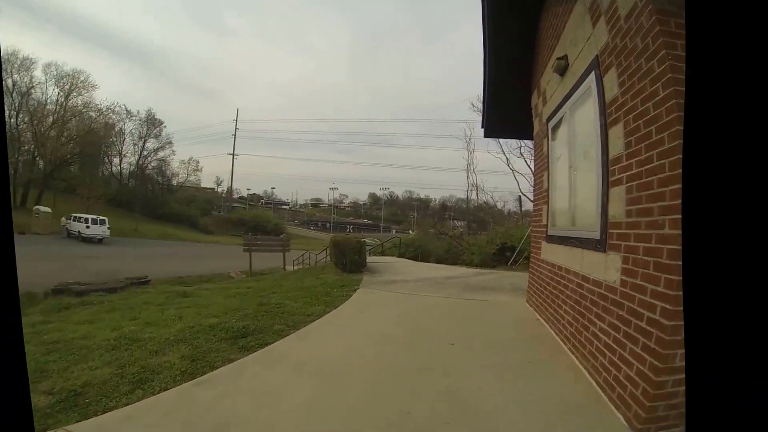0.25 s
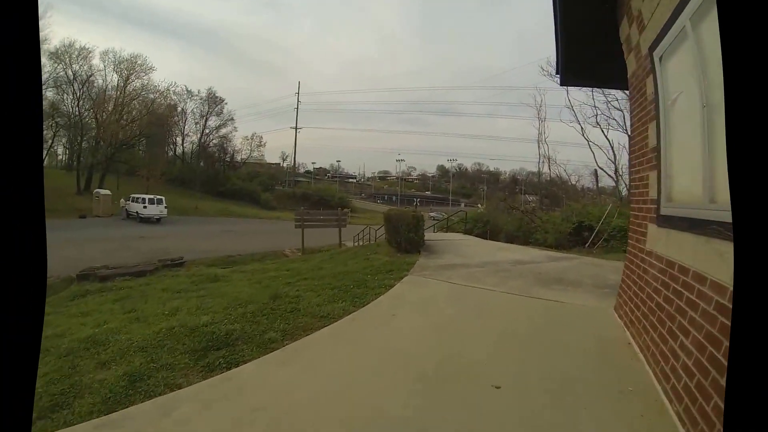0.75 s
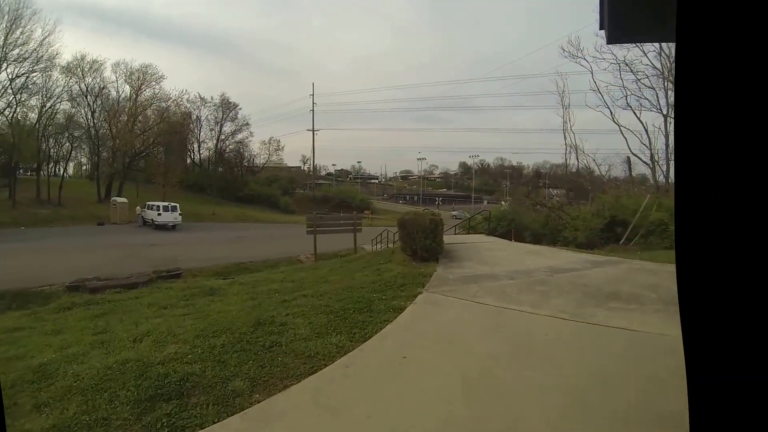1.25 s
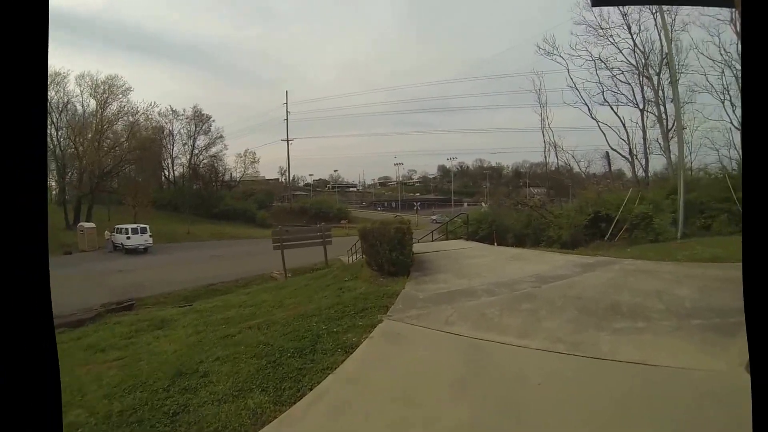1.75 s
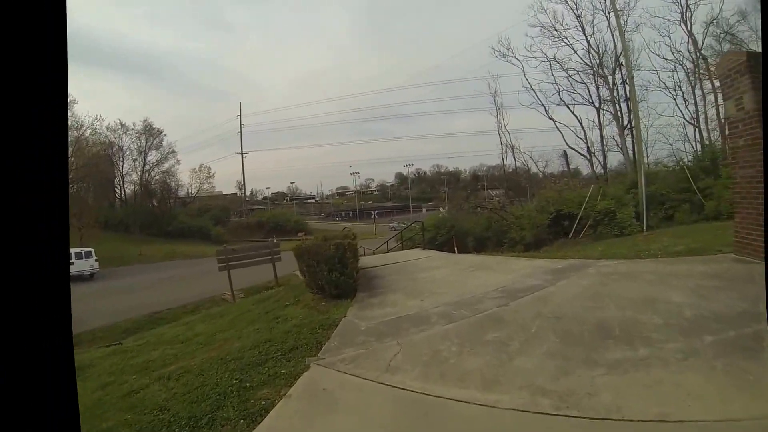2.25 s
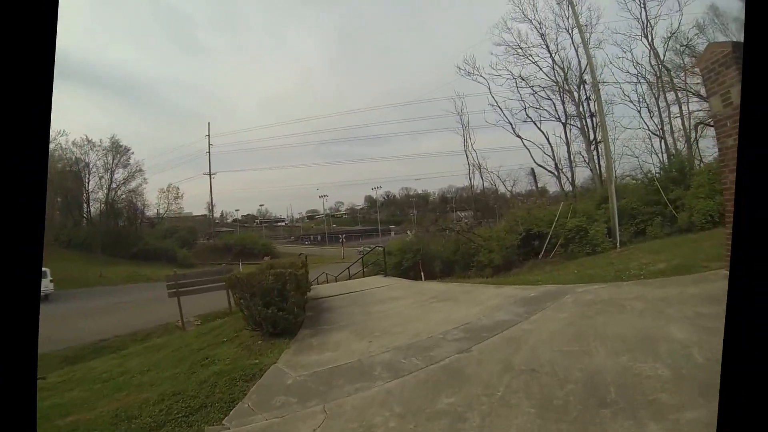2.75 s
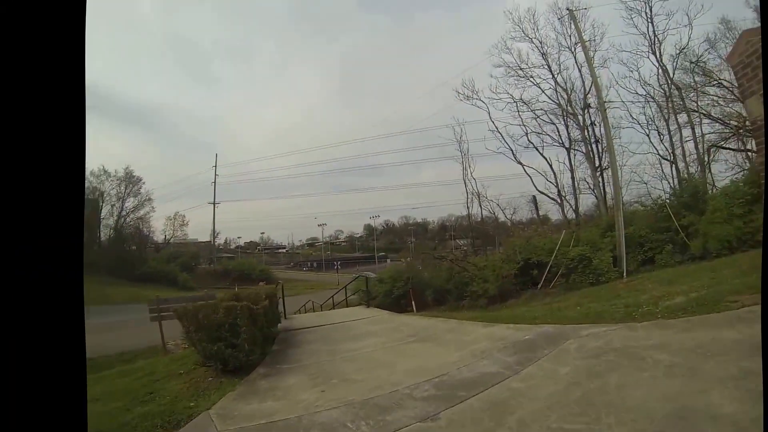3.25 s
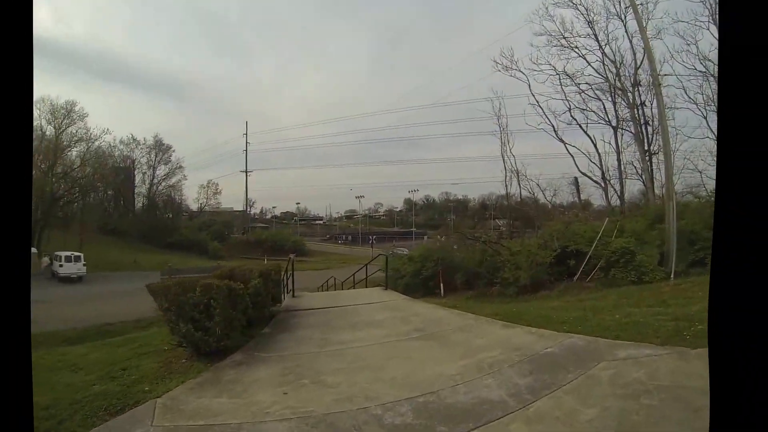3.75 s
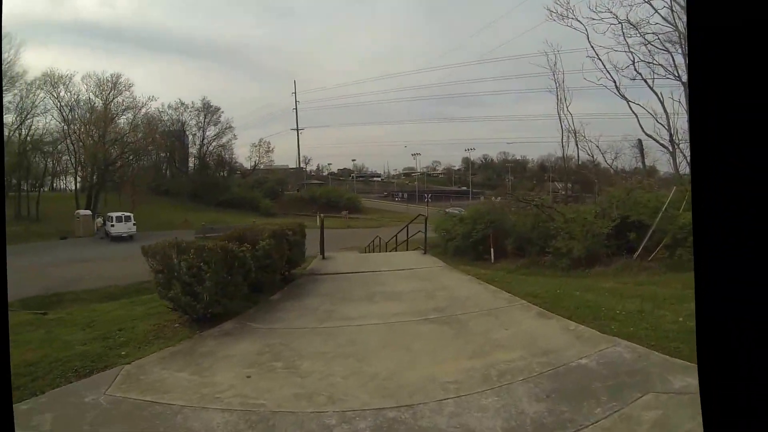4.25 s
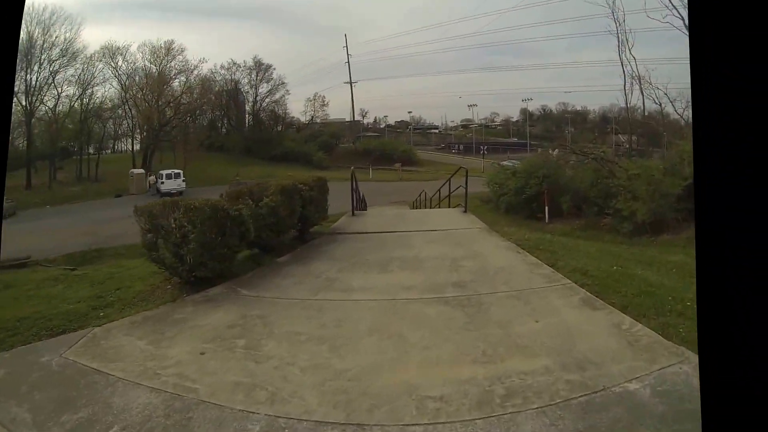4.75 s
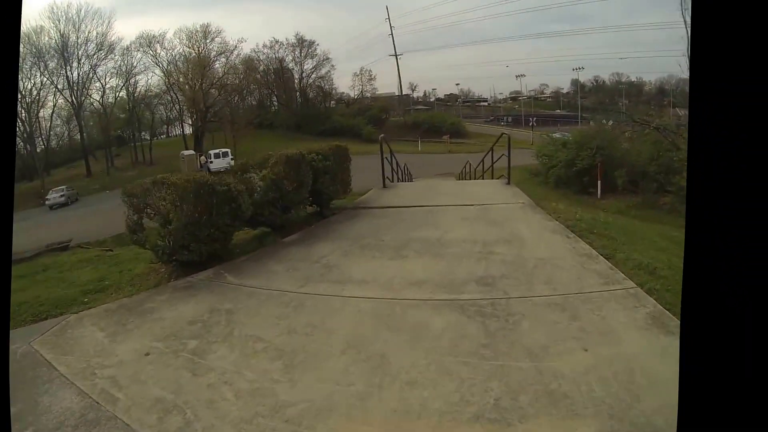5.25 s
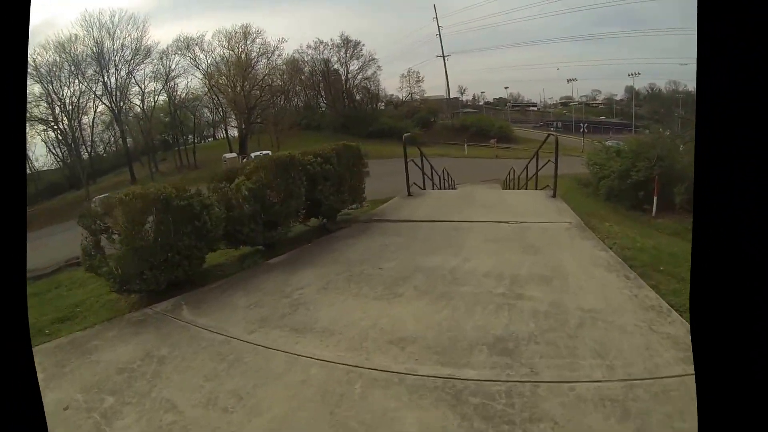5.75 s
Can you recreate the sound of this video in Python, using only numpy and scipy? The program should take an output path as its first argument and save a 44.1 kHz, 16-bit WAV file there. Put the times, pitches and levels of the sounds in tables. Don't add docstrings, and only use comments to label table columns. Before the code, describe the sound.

Outdoors, a skateboard rolls along a concrete path, heard from a microphone shut in a plastic case close to the wheels. Muffled gritty rumble carries hollow knocks at small cracks. Distorting hard clacks strike near one, three and five seconds, leaving metal axles ringing. Low wind heaves and flutters throughout, buffeting hardest just before three seconds; the end turns rough and rattly.

```python
import sys
import numpy as np
from scipy import signal
from scipy.io import wavfile
from scipy.ndimage import uniform_filter1d

SR = 44100
rng = np.random.default_rng(int(sys.argv[2]) if len(sys.argv) > 2 else 0)


def unload_wav(signal):
    wavfile.write(
        sys.argv[1],
        SR,
        np.round(np.clip(np.atleast_2d(signal).T, -1, 1) * 32767).astype(np.int16),
    )


def natural_amplitude(level_db):
    exponent = np.asarray(level_db, float) / 20
    return 10 ** exponent


N = 265041

# time in seconds, wheel load in dB, coarseness of the slab in dB.
ROLLING = [(0.0, -38, 3), (0.15, -42, -1), (0.38, -51.5, -1.5), (0.62, -48, -1), (0.74, -40.5, 0.5),
           (0.87, -52.5, -0.5), (1.4, -47.5, 0.5), (1.61, -52, -5), (2.79, -51.5, 0.5), (2.88, -46.5, 4),
           (3.11, -44, 2), (3.28, -55.5, 3), (3.78, -50, 2), (4.62, -50, 3), (5.15, -46, 5.5),
           (5.67, -44, 9), (5.81, -47, 7), (6.01, -51, 5)]
# start in seconds, peak in dB,
# case pitch in Hz, sharpness in dB.
SOFT_KNOCKS = [(0.0643, -28, 1290, -38), (0.1622, -27.5, 1390, -20), (0.3795, -18, 1404, -8.5),
               (0.394, -25.5, 1550, -6.5), (0.4082, -30.5, 1350, -9), (0.8177, -30.5, 1340, -13),
               (0.827, -29, 1446, -6.5), (0.9660, -22.5, 1420, -10.5), (1.009, -25.5, 1264, -11),
               (1.096, -22.5, 1425, -16), (1.1605, -38.5, 1390, -16.5), (1.2069, -24.5, 1340, -31),
               (1.3022, -34, 1450, -18.5), (2.77, -37, 1630, -19), (2.991, -25.5, 1380, -24),
               (3.0869, -40, 1350, -10), (3.2909, -22.5, 1264, -9), (3.3124, -37, 1460, -17),
               (3.3228, -23, 1280, -15), (3.554, -29, 1314, -25), (3.568, -32, 1365, -30),
               (3.599, -19.5, 1400, -17.5),
               (5.0457, -30, 1437, -19), (5.2734, -22, 1280, -15.5), (5.3161, -26, 1400, -20),
                      (5.3368, -30.5, 1417, -29), (5.388, -31, 1210, -21), (5.4519, -43, 1290, -11.5),
                      (5.4861, -21, 1320, -27), (5.5138, -21.5, 1350, -17.5), (5.5454, -23, 1290, -23),
                      (5.5556, -28, 1340, -17), (5.5721, -17.5, 1320, -20), (5.5817, -36, 1280, -9),
                      (5.5908, -22, 1350, -24), (5.599, -33, 1320, -22), (5.6386, -27.5, 1270, -17),
                      (5.7413, -25.5, 1320, -28), (5.768, -31, 1340, -32), (5.8023, -22, 1360, -33),
                      (5.823, -15.5, 1340, -24), (5.9944, -20, 1275, -25)]
# start in seconds, peak in dB, case pitch in Hz, upper modes in dB, axle ring in dB.
HARD_CLACKS = [(1.1086, 1, 2220, 3, -33), (1.1122, -6.5, 1540, -15, -86), (2.9195, 5, 1630, -9, -37.5),
               (3.125, -27, 1540, -20, -91), (3.137, -21.5, 1470, -25, -86),
               (3.1511, -21.5, 1550, -24, -98), (3.1553, -2.5, 1614, -17, -52),
               (3.163, -33, 1480, -10, -69), (5.15, -3.5, 1613, -14, -67), (5.1674, -20, 1566, -15, -95),
               (5.1747, -6.5, 1580, -19, -55)]
# start in seconds, length in seconds, rms in dB, centre in Hz, width in Hz.
WHEEL_SCUFFS = [(0, 0.012, -54, 7000, 8050), (.03, .16, -34.5, 1269, 254), (0.122, .07, -62, 2300, 1200),
                (0.755, 0.097, -54, 2000, 900), (1.36, .05, -70, 10500, 5960),
                (2.709, 0.045, -54, 1940, 960), (2.799, .11, -45, 1440, 646), (3.079, 0.11, -46, 2000, 900),
                (3.135, 0.02, -56, 3530, 500), (4.898, .05, -58, 2080, 898),
                (5.065, 0.087, -44.5, 1880, 890), (5.273, 0.086, -46, 1370, 530),
                (5.473, 0.17, -62, 4200, 4000), (5.5, 0.075, -42, 1500, 560)]
# time in seconds, strength in dB.
WIND_STRENGTH = [(0.0, -30.5), (0.42, -30.5), (1.22, -39.5), (1.25, -27.5), (1.56, -29), (1.64, -49),
                 (1.72, -32), (2.24, -39), (2.89, -21.5), (2.93, -31.5), (3.82, -32.5), (3.93, -48),
                 (4.0, -34.5), (4.25, -39.5), (5.42, -29), (5.88, -35), (5.98, -20), (6.01, -28)]
# time in seconds, peak in dB, pitch in Hz, sign of the push, case thump in dB.
WIND_BUFFETS = [(2.525, -24, 70, -1, -56), (2.64, -24.5, 64, 1, -51), (2.706, -13, 72.4, -1, -40.5),
                (2.729, -14, 90.5, 1, -29), (2.746, -13, 61, 1, -42.5), (2.77, -39, 90, -1, -43),
                (2.791, -15, 60.4, 1, -35.5), (2.834, -45, 89, 1, -42), (2.867, -15, 48.7, 1, -45),
                (2.889, -18, 60.5, 1, -41), (2.986, -26, 79.4, 1, -55), (3.389, -22, 62.4, 1, -48.5),
                (3.505, -25.5, 77, -1, -57), (3.55, -29, 69.4, -1, -53.5), (3.774, -33, 90, -1, -54)]

# frequency in Hz, level in dB, t60 in seconds.
PLATE_MODES = [(1992, 4, 0.0084), (2560, 3, 0.022), (3185, 4, 0.014), (3712, 3, 0.011)]
# level in dB, t60 in seconds, gain in dB per dB of sharpness.
AXLE_MODES = [(-8, .9, 0), (-9, .15, -.4), (0, .22, 0), (-26, 1.2, -.2), (-10, 1.2, .4), (-24, .8, 1.5),
              (-28, .9, 1.5), (-26, .5, 1.5), (-25, 1.0, 1.5), (-26, .6, 1.5), (-34, .6, 1.5)]
AXLE_PITCHES = np.array([1965, 2412, 2654, 2939, 3478, 4091, 4290, 4791, 5469, 5911, 6347])

# frequency in Hz, level in dB.
CASE_BAND = [(900, -26.5), (1050, -11.5), (1270, 2), (1400, -2.5), (1520, -2.5), (1700, -10.5),
             (1900, -24.5), (2100, -33)]
# frequency in Hz, level in dB.
DECK_BAND = [(90, -11.5), (160, -3.5), (220, -2), (380, -9.5), (550, -4.5), (750, -10.5), (1000, -12),
             (1250, -40.5)]
# frequency in Hz, level in dB.
TRUCK_BAND = [(1600, -26.5), (1900, -7.5), (2330, -5), (2700, -4.5), (2950, -11), (3500, -37)]
# frequency in Hz, level in dB.
GRIT_BAND = [(2300, -27), (2750, -1), (3400, 1), (3750, -1.5), (4000, -6), (4500, -31)]
# frequency in Hz, level in dB.
HISS_BAND = [(3500, -24.5), (4200, -4), (4700, -5.5), (5070, 2.5), (5600, -7), (7000, -9), (8000, -8.5),
             (8800, -16), (9600, -12), (10000, -8), (11000, -14.5), (13500, -20), (14200, -24.5),
             (15700, -30)]
# frequency in Hz, level in dB.
KNOCK_LOW_BAND = [(100, -21), (220, -6.5), (380, -9), (550, -2.5), (750, -6), (1000, -27.5)]
# frequency in Hz, level in dB.
KNOCK_UPPER_BAND = [(1650, -13.5), (1950, -1.5), (2330, 0.5), (2600, -15.5), (3050, -10), (3600, -21.5),
                    (4000, -34.5), (4600, -52)]
# frequency in Hz, level in dB.
KNOCK_TICK_BAND = [(4000, -22.5), (5070, 4), (5800, -5), (7200, -9), (9500, -10.5), (11500, -27.5),
                   (14000, -50)]
# frequency in Hz, level in dB.
KNOCK_RING_BAND = [(600, -38), (950, -5.5), (1150, -1), (1650, -3.5), (1900, -18.5), (2300, -35.5), (3000, -58)]
# frequency in Hz, level in dB.
CLACK_MODES_BAND = [(500, -41.5), (1000, -14.5), (1250, 1.5), (3700, 6), (4000, -8), (6000, -30),
                    (12000, -60.5)]
# frequency in Hz, level in dB.
THUD_BAND = [(60, -25), (120, -1.5), (250, -2.5), (340, -8), (520, -10), (750, -5), (1000, -10),
             (1300, -39)]
# frequency in Hz, level in dB.
HEAVE_BAND = [(8, -17), (18, -4.5), (30, 2), (52, 0), (66, -11.5), (85, -25), (120, -38), (200, -60.5)]
# frequency in Hz, level in dB.
FLUTTER_BAND = [(50, -22), (80, 3), (115, 3), (170, -8.5), (260, -18), (450, -34.5), (900, -71)]

USUAL_LOAD_DB = -50
DECK_DB, DECK_PER_LOAD, DECK_PER_COARSE = -55, 1.015, 0.2
TRUCK_DB, TRUCK_PER_LOAD, TRUCK_PER_COARSE = -66, 0.4, 0.3
GRIT_DB = -66.5
HISS_DB, HISS_PER_COARSE = -71, 0.33
RATTLE_T60_S = 0.04
TICK_DB, TICK_PER_DB = -29.5, -0.25
BEAT_SHARE = 0.14
BUSHING_DB, BUSHING_S = -13, 0.3
CHATTER_PER_S, CHATTER_DB, CHATTER_FROM_DB = 25, -63.5, 5.5
FLUTTER_DB, FLUTTER_PER_WIND = -59.5, 0.28
WAKE_DB, WAKE_S = -23.5, 0.036


def evened(x):
    return x / np.sqrt(np.mean(x ** 2) + 1e-20)


def peaked(x, db):
    return natural_amplitude(db) * x / abs(x).max()


def columns(rows):
    s, *values = np.transpose(rows)
    return [np.interp(np.arange(N) / SR, s, v) for v in values]


def response(points, size=4096):
    f, db = np.transpose(points)
    hz = abs(np.fft.fftfreq(4 * size, 1 / SR))
    log_level = np.interp(np.log(hz + 1), np.log(f), db, -110, -110) * np.log(10) / 20
    taps = np.fft.ifft(np.exp(np.conj(signal.hilbert(log_level)))).real
    taps = max(taps[:size], taps[::-1][:size], key=np.linalg.norm)
    return taps / np.linalg.norm(taps)


def colour(x, points, size=4096):
    return signal.oaconvolve(x, response(points, size=size))[:len(x)]


def wobble(smooth_s):
    width = max(int(smooth_s * SR), 1)
    once = uniform_filter1d(rng.standard_normal(N), width)
    return evened(uniform_filter1d(once, width))


def add(mix, s, sound):
    part = mix[round(s * SR):][:len(sound)]
    part += sound[:len(part)]


def rolling(per_s=1500, spread_db=2.0, smooth=0.85, lumpy_db=0.5):
    case_db, coarse_db = columns(ROLLING)
    load_db = case_db - USUAL_LOAD_DB
    deck_db = DECK_DB + DECK_PER_LOAD * load_db + DECK_PER_COARSE * coarse_db
    truck_db = TRUCK_DB + TRUCK_PER_LOAD * load_db + TRUCK_PER_COARSE * coarse_db
    grit_db = GRIT_DB + coarse_db
    hiss_db = HISS_DB + HISS_PER_COARSE * coarse_db

    click_sizes = natural_amplitude(spread_db * np.minimum(rng.exponential(1, N), 5))
    clicks = click_sizes * (rng.random(N) < per_s / SR)
    drive = evened(clicks * rng.choice([-1., 1.], N)) + smooth * rng.standard_normal(N)
    drive = evened(drive * natural_amplitude(lumpy_db * wobble(0.012)))

    out = natural_amplitude(case_db) * colour(drive, CASE_BAND)
    out += natural_amplitude(deck_db) * colour(drive, DECK_BAND)
    out += natural_amplitude(truck_db) * colour(drive, TRUCK_BAND)
    out += natural_amplitude(grit_db) * colour(drive, GRIT_BAND)
    return out + natural_amplitude(hiss_db) * colour(0.14 * drive + rng.standard_normal(N), HISS_BAND)


def knocks(length=5000):
    t, out = np.arange(length) / SR, np.zeros(N)
    events = SOFT_KNOCKS
    rattles = rng.standard_normal((len(events), 2, length))
    for (s, db, hz, sharp_db), (fine, size) in zip(events, rattles):
        drive = fine * natural_amplitude(3.1 * size - 60 * t / RATTLE_T60_S) * np.minimum(t / 0.0005, 1)
        drive[8] += 8.0
        modes = np.sin(2 * np.pi * hz * t) + 0.5 * np.sin(2 * np.pi * 1.145 * hz * t)
        ring = natural_amplitude(-60 * t / 0.021) * modes
        tick_db = TICK_DB + TICK_PER_DB * (db + 23.5) + 0.15 * (sharp_db + 18)

        sound = peaked(colour(signal.fftconvolve(drive, ring)[:length], KNOCK_RING_BAND), 0)
        sound += peaked(colour(drive, KNOCK_LOW_BAND), -11.5)
        sound += peaked(colour(drive, KNOCK_UPPER_BAND), sharp_db + 5.0)
        sound += peaked(colour(drive, KNOCK_TICK_BAND), tick_db)
        add(out, s, natural_amplitude(db) * sound)
    return out


def clacks(length=40000):
    t, out = np.arange(length) / SR, np.zeros(N)
    rise = 1 - np.exp(-t / 0.00061)
    ring_db, ring_t60, sharpness = np.transpose(AXLE_MODES)
    each_t = t[:, None]
    axle_decay = natural_amplitude(ring_db - 60 * each_t / ring_t60 + BUSHING_DB * (each_t / BUSHING_S) ** 2)
    axle = axle_decay * np.sin(2 * np.pi * AXLE_PITCHES * each_t)
    plate = sum(natural_amplitude(db - 60 * t / t60) * np.sin(2 * np.pi * hz * t) for hz, db, t60 in PLATE_MODES)
    thud = colour(np.exp(-t / 0.0002), THUD_BAND)

    noises = rng.standard_normal((len(HARD_CLACKS), length))
    for (s, db, hz, upper_db, axle_db), fine in zip(HARD_CLACKS, noises):
        beating = 0.44 + np.cos(np.pi * BEAT_SHARE * hz * t)
        case = natural_amplitude(-60 * t / 0.018) * np.sin(2 * np.pi * hz * t) * beating
        modes = peaked(rise * case, 0) + peaked(rise * plate, upper_db)
        rattle = colour(fine * natural_amplitude(-60 * t / 0.033), CASE_BAND)
        crack = colour(fine * natural_amplitude(-60 * t / 0.012), KNOCK_TICK_BAND)

        blow = peaked(colour(modes, CLACK_MODES_BAND), max(upper_db, 0))
        blow += peaked(rattle, -17)
        blow += peaked(crack, 1.5 * upper_db + 0.982 * db - 17.5)
        blow += peaked(thud, 0.5 * upper_db + 0.61 * db - 19)
        brightness = natural_amplitude(sharpness * (upper_db - 5))
        add(out, s, natural_amplitude(db) * blow + natural_amplitude(axle_db) * rise * (axle @ brightness))
    return out


def scuffs():
    out = np.zeros(N)
    for s, length, db, hz, width_hz in WHEEL_SCUFFS:
        fine, size = rng.standard_normal((2, 8000))[:, :int(length * SR)]
        edges = [hz - width_hz / 2, hz + width_hz / 2]
        band = signal.butter(3, edges, "bandpass", fs=SR, output="sos")
        drag = evened(signal.sosfilt(band, fine * natural_amplitude(2.8 * size)))
        add(out, s, natural_amplitude(db) * drag * np.hanning(len(fine)) ** 0.42)
    return out


def chatter(spread_db=2.5):
    coarse_db = columns(ROLLING)[1]
    per_s = CHATTER_PER_S * np.maximum(coarse_db - CHATTER_FROM_DB, 0)
    tick_sizes = natural_amplitude(spread_db * np.minimum(rng.exponential(1, N), 3))
    ticks = tick_sizes * (rng.random(N) < per_s / SR)
    burst = rng.standard_normal(300) * natural_amplitude(-60 * np.arange(300) / SR / 0.0036)
    drive = natural_amplitude(CHATTER_DB + 18) * signal.oaconvolve(ticks, burst / np.linalg.norm(burst))[:N]

    out = natural_amplitude(12.0) * colour(drive, CASE_BAND)
    out += natural_amplitude(-5.0) * colour(drive, GRIT_BAND)
    out += natural_amplitude(1.0) * colour(drive, KNOCK_LOW_BAND)
    return out + colour(drive, KNOCK_TICK_BAND)


def wind(lumpy_db=5.0):
    strength_db, = columns(WIND_STRENGTH)
    heave = evened(colour(rng.standard_normal(N), HEAVE_BAND, size=16384))
    gusty = rng.standard_normal(N) * natural_amplitude(lumpy_db * wobble(0.17))
    flutter = evened(colour(gusty, FLUTTER_BAND, size=8192))
    clock = np.arange(N) / SR
    wake = sum(natural_amplitude(db + WAKE_DB) * np.exp(-((clock - s) / WAKE_S) ** 2) for s, db, *_ in WIND_BUFFETS)
    flutter_level = natural_amplitude(FLUTTER_DB + FLUTTER_PER_WIND * (strength_db + 35)) + wake
    out = natural_amplitude(strength_db + 2.8 * wobble(0.03) - 1.5) * heave + flutter_level * flutter

    t = np.arange(4410) / SR - 0.05
    thump = np.cos(2 * np.pi * 190 * t) + 0.98 * np.cos(2 * np.pi * 360 * t)
    thump = thump * np.exp(-(t / 0.0038) ** 2)
    for s, db, hz, sign, thump_db in WIND_BUFFETS:
        push = np.cos(2 * np.pi * hz * t) * np.exp(-(hz * t / 0.36) ** 2)
        add(out, s - 0.05, np.sign(sign) * (natural_amplitude(db) * push + natural_amplitude(thump_db) * thump))
    return out


def scene():
    return (rolling() + knocks() + clacks() + scuffs() + chatter() + wind())[None]


def roll_off(x):
    return signal.sosfilt(signal.butter(12, 15720, fs=SR, output="sos"), x)


def record(dry):
    squeezed = dry / (1 + abs(dry) ** 6.06) ** (1 / 11.0)
    highpass = signal.butter(2, 10000, "highpass", fs=SR, output="sos")
    splatter = signal.sosfiltfilt(highpass, squeezed - dry)
    return roll_off(squeezed - 0.92 * splatter)


dry = scene()
out = record(dry)
unload_wav(out)
```